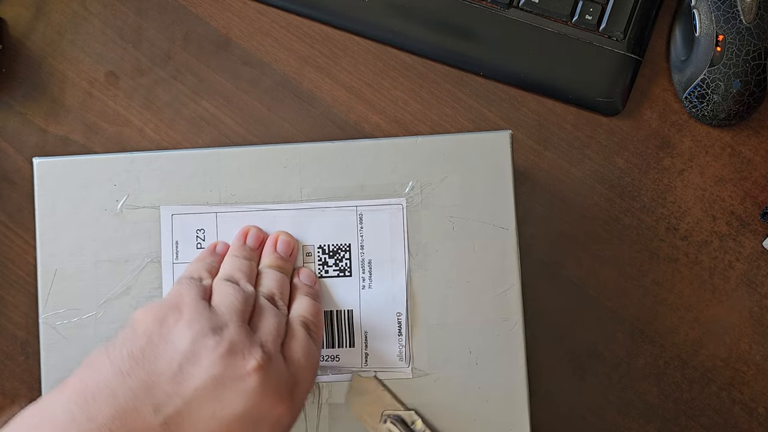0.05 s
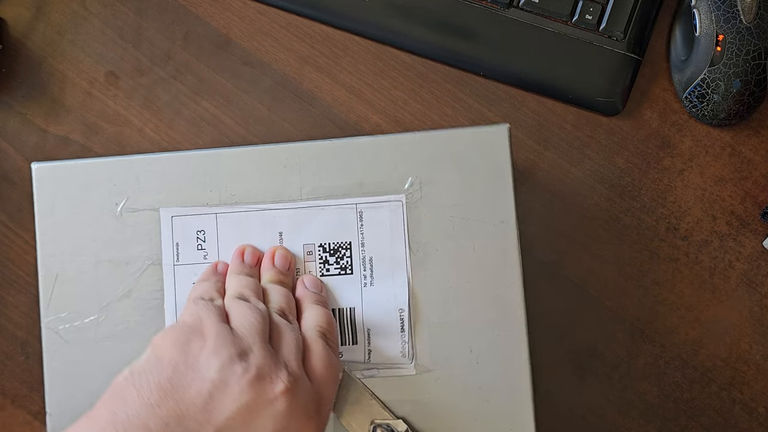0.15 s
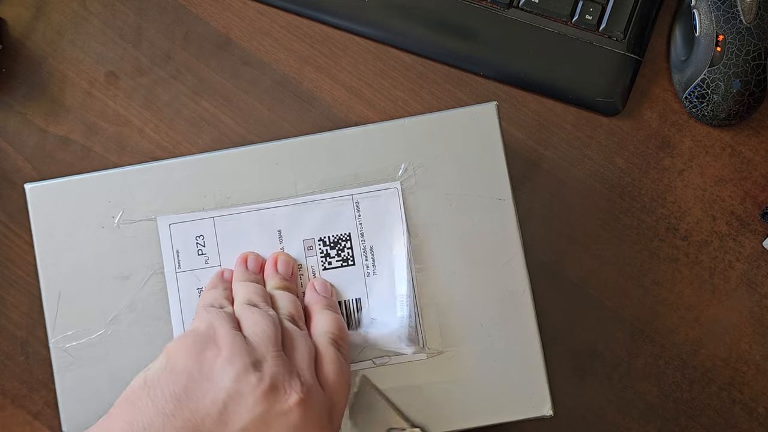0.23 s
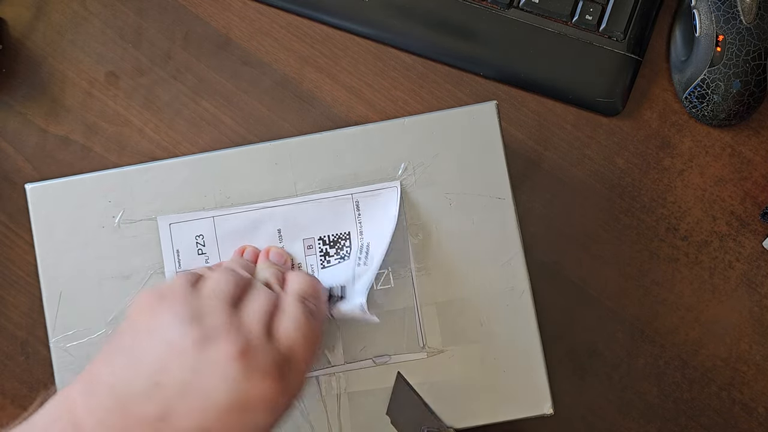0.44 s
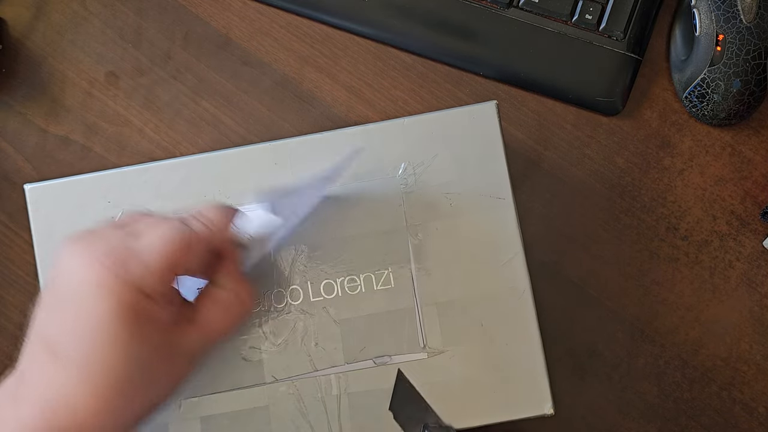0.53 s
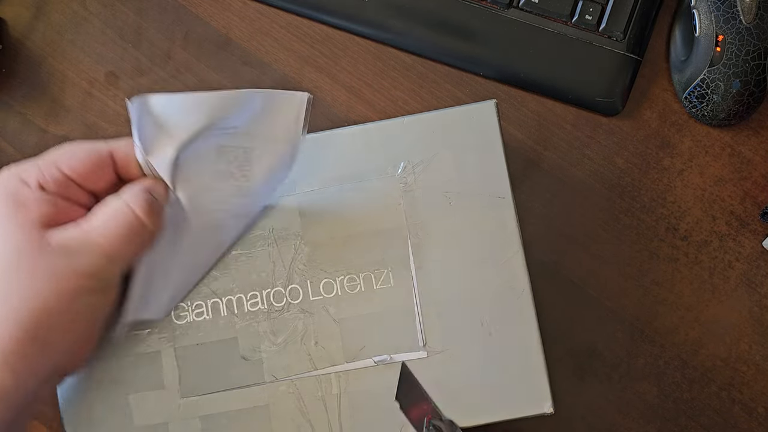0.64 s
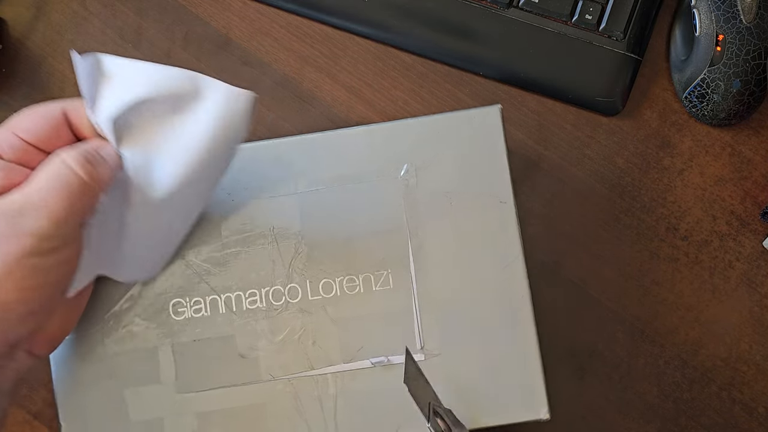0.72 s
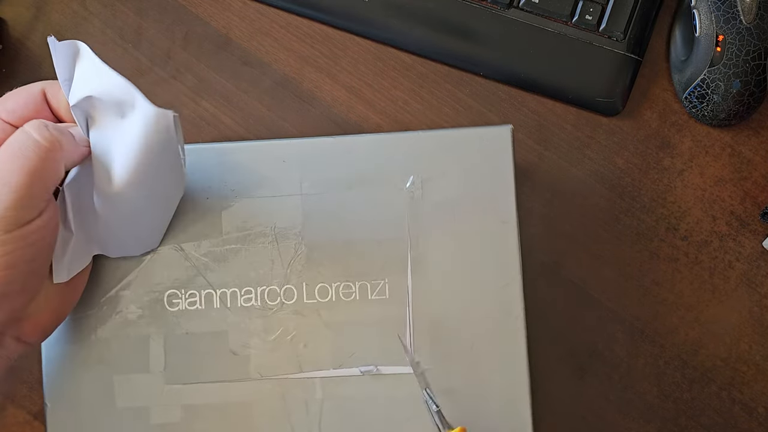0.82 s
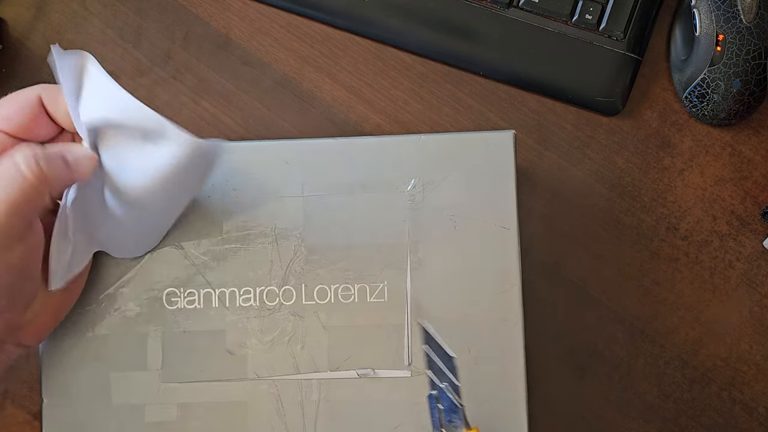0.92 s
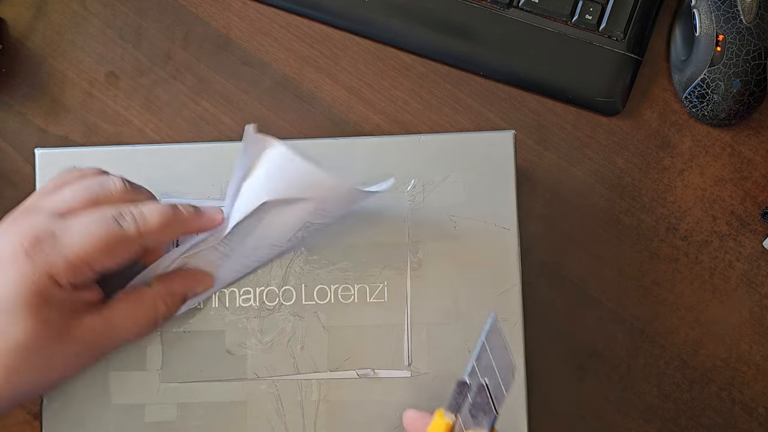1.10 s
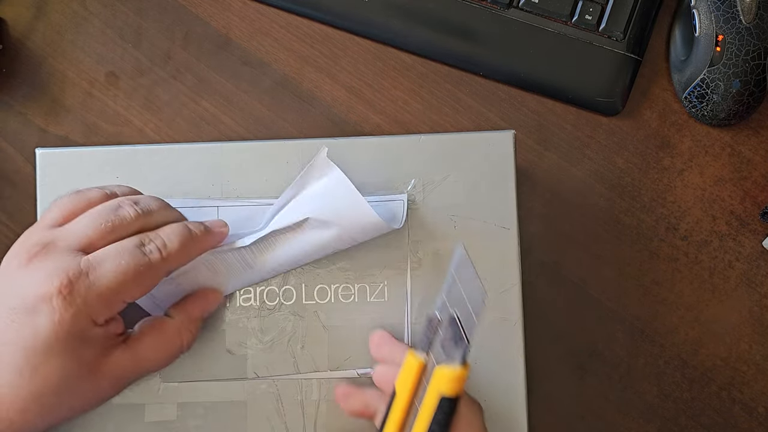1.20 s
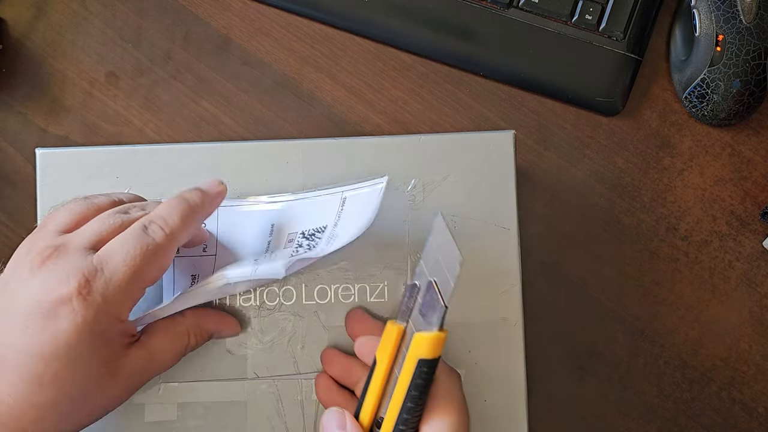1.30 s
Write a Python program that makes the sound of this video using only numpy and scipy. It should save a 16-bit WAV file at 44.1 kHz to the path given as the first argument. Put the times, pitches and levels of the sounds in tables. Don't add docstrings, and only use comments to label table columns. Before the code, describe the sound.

Close up, an adhesive label rips off a hollow carton: a short snap, a rough tear, then a hard final burst, followed by faint paper handling over quiet room rumble and hiss.

```python
import sys
import numpy as np
from scipy import signal
from scipy.fft import rfft, irfft
from scipy.io import wavfile
from scipy.ndimage import uniform_filter1d

SR = 44100
rng = np.random.default_rng(int(sys.argv[2]) if len(sys.argv) > 2 else 0)


def unload_wav(signal):
    wavfile.write(
        sys.argv[1],
        SR,
        np.round(np.clip(np.atleast_2d(signal).T, -1, 1) * 32767).astype(np.int16),
    )


def volts_from_db(level):
    exponent = np.asarray(level, float) / 20
    return 10 ** exponent


N = 59535

PORT_HZ = 1740
PORT_DB = np.array([0.54, -0.46])


def evened(x):
    return x / np.sqrt(np.mean(x ** 2) + 1e-20)


def peaked(x):
    return x / np.max(abs(x))


def read(points, hz):
    f, value = np.transpose(points)
    return np.interp(np.log(hz + 1), np.log(f + 1), value)


def add(mix, s, sound):
    part = mix[..., round(s * SR):][..., :sound.shape[-1]]
    part += sound[..., :part.shape[-1]]


def colour(x, points):
    return irfft(rfft(x) * volts_from_db(read(points, np.fft.rfftfreq(len(x), 1 / SR))), len(x))


def band(x, hz, kind, order=2):
    return signal.sosfilt(signal.butter(order, np.clip(hz, 20, 20000), kind, fs=SR, output="sos"), x)


def snap(start, db, hz, box_db, crack_db, rise_s, slower):
    noise, size, slip_noise = rng.standard_normal((3, 3000))
    t = np.arange(3000) / SR
    rise = np.minimum(t / rise_s, 1)
    tick = volts_from_db(5 - 60 * t / 0.0025)
    cracks = noise * abs(size) * rise * (volts_from_db(-60 * t / 0.013 / slower) + tick)
    slips = slip_noise * rise * (volts_from_db(-60 * t / 0.0069 / slower) + volts_from_db(-14) * tick)
    crackle = peaked(band(band(cracks, 10000, "low", order=1), 3360, "high"))
    sound = volts_from_db(-9.5) * sheet_ring(t, hz, slips, rise_s, slower) + volts_from_db(8 + crack_db) * crackle
    sound = sound + volts_from_db(-4 + box_db) * box_thump(t, slips)
    return start - rise_s, ports(volts_from_db(db) * sound)


def sheet_ring(t, hz, slips, rise_s, slower):
    tone = np.minimum(t * hz / 2, 1) * volts_from_db(-60 * t / 0.009) * np.sin(2 * np.pi * hz * t)
    push = rng.choice([-4, 4]) / slower ** 2 * np.exp(-((t - rise_s) * hz * 4) ** 2)
    ring = peaked(signal.oaconvolve(push + 0.53 * slips, tone)[:len(t)])
    flap = peaked(band(band(slips, 4940, "low", order=4), 685, "high"))
    spike = band(np.exp(-((t - rise_s) / 0.00007) ** 2), 810, "high", order=1)
    return ring + volts_from_db(0.5) * flap - volts_from_db(-3) / slower ** 2 * spike


def box_thump(t, slips):
    shove = np.exp(-t / 0.0008) + 0.28 * slips
    shift = 1 + 0.1 * np.tanh(rng.standard_normal())
    return peaked(signal.oaconvolve(shove, box_ring(shift))[:len(t)])


def box_ring(shift=1):
    # f/Hz, level/dB, t60/s
    box_modes = [(130, -2, 0.049), (159, 0.5, 0.025), (291.6, 5, 0.024), (325.8, 2.5, 0.045),
                 (445, 1.5, 0.023), (474, -1, 0.022), (646, 2.5, 0.0087)]
    t, ring = np.arange(4410) / SR, 0
    for k, (hz, db, t60) in enumerate(box_modes):
        decay = volts_from_db(db - 60 * t / np.clip(t60, .01, .04))
        ring = ring + (-1) ** k * decay * np.sin(2 * np.pi * hz * shift * t)
    return peaked(ring)


def rustle():
    # f/Hz, density/dB per Hz
    sheet_spectrum = [(290, -51), (500, -1.5), (855, -18), (1320, -6.5), (2460, -9), (3700, -10.5),
                      (16000, -23.5)]
    # f/Hz, density/dB per Hz
    glue_spectrum = [(180, -43), (300, -21), (1430, -5), (2520, -54), (3350, -10.5), (16000, -11.5)]
    # start t/s, length/s, effort level/dB, brightness/0-1, box rub level/dB
    strokes = [(0, 0.0095, -46, 0.48, 0.5), (0.049, 0.1, -51, 0.9, -25), (0.222, 0.015, -24, 0.64, -17),
               (0.326, 0.037, -51.5, 0, -9), (0.401, 0.052, -30, 0.6, -35), (0.469, 0.044, -36, 0.03, -4),
               (0.531, 0.051, -40, 0.41, -1), (0.593, 0.047, -29.5, 0.64, -23),
               (0.641, 0.011, -20.5, 0.76, -35), (0.662, 0.066, -38, 0.28, -20),
               (0.745, 0.021, -47, 0.4, -39), (0.88, 0.04, -41, 0.3, -10), (0.918, 0.038, -51, 0, -3),
               (1.037, 0.021, -41, 0.26, -10), (1.085, 0.04, -49.5, 0.32, -7),
               (1.215, 0.017, -53, 0.07, -30), (1.237, 0.019, -52.5, 0.07, -34),
               (1.273, 0.012, -41.5, 0.4, -23), (1.328, 0.023, -49.5, 0.7, -8)]
    grains_per_s, grain_spread_db, grain_s = 2500, 4, 0.003
    rise_s, fall_db_per_s = 0.0073, 519
    t, layers = np.arange(N) / SR, []
    for spectrum in (sheet_spectrum, glue_spectrum):
        size = volts_from_db(grain_spread_db * np.minimum(rng.exponential(1, N), 5))
        size = size * (rng.random(N) < grains_per_s / SR)
        envelope = signal.oaconvolve(size, volts_from_db(-60 * t[:400] / grain_s / 3))[:N]
        grains = envelope * rng.standard_normal((2, N))
        left, right = [evened(colour(side, spectrum)) for side in grains]
        layers.append(np.array([left, right + band(left - right, PORT_HZ, "low", order=1)]))
    short_ring = box_ring() * volts_from_db(-60 * t[:4410] / 0.0075)
    dull, tearing = layers
    rub = evened(signal.oaconvolve(grains[0], short_ring)[:N])
    out = np.zeros((2, N))
    for start, length, db, bright, rub_db in strokes:
        share = np.clip(bright, 0, 1)
        fall = volts_from_db(db - fall_db_per_s * np.maximum(t - start - length, 0))
        shape = np.clip((t - start) / rise_s, 0, 1) * fall
        out += shape * ((1 - share) * dull + share * tearing + volts_from_db(rub_db) * rub)
    return volts_from_db(3.5 + PORT_DB)[:, None] * out


def strain(start, length, db, from_hz, to_hz):
    t = np.arange(2000) / SR
    u = np.clip(t / length, 0, 1)
    glide = from_hz * (to_hz / from_hz) ** np.sqrt(u)
    turn = np.exp(2j * np.pi * np.cumsum(glide) / SR)
    r = np.exp(-np.pi * 500 / SR)
    real, imaginary = rng.standard_normal((2, 2000))
    slow = signal.lfilter([1], [1, -2 * r, r * r], real + 1j * imaginary, zi=[300, 0])[0]
    swell = abs(np.sin(np.pi * u ** .7))
    return start, volts_from_db(db) * peaked(swell * (turn * slow).real) * volts_from_db(PORT_DB)[:, None]


def ports(x):
    path = rng.standard_normal((2, 200)) * volts_from_db(-60 * np.arange(200) / SR / 0.00067)
    path = volts_from_db(2.5) * path / np.linalg.norm(path, axis=1)[:, None]
    path[[0, 1], [0, 3]] += 1
    low = band(x, PORT_HZ, "low", order=1)
    high = signal.oaconvolve((x - low)[None], path, axes=1)[:, :len(x)]
    return low + volts_from_db(PORT_DB)[:, None] * high


def room(x):
    # f/Hz, t60/s
    room_decay = [(200, 0.046), (1000, 0.088), (4000, 0.17), (12000, 0.11)]
    taps = np.zeros((2, SR // 2))
    at = np.arange(round(.003 * SR), SR // 2 - 20, 10)
    taps[:, at] = rng.choice([-1., 1.], (2, len(at)))
    hz, t, z = signal.stft(taps, SR, nperseg=128)
    z[1] = np.where(hz[:, None] < 500, z[0], z[1])
    tail = signal.istft(z * volts_from_db(-60 * t / read(room_decay, hz)[:, None]), SR, nperseg=128)[1]
    return signal.fftconvolve(x[None], tail / np.linalg.norm(tail[0]), axes=1)[:, :N]


def hum():
    # f/Hz, density/dB per Hz
    hum_spectrum = [(20, -32), (42, 2), (75, -4.5), (105, -5.5), (300, -10.5), (800, -17.5), (2000, -22.5),
                    (16000, -37.5)]
    # f/Hz, correlation/0-1
    likeness = [(60, 0.93), (180, 0.91), (550, 0.52), (1650, 0.04), (4970, 0.24), (15000, 0.23)]
    # t/s, level/dB, f/Hz, t60/s
    desk_thuds = [
        (.004, -31, 65, .07),
        (.255, -40, 60, .1),
        (1.035, -38, 55, .12),
        (1.265, -38, 42, .15),
    ]
    frames, hz = N // 256 + 5, np.fft.rfftfreq(1024, 1 / SR)
    a, b, c, d, patches = rng.standard_normal((frames, 513, 5)).T
    patches = uniform_filter1d(uniform_filter1d(patches, size=12, axis=0), size=14, axis=1)
    same, left = np.clip(read(likeness, hz), -1, 1)[:, None], a + 1j * b
    right = same * left + np.sqrt(1 - same ** 2) * (c + 1j * d)
    z = np.array([left, right]) * volts_from_db(read(hum_spectrum, hz)[:, None] + 1.5 * evened(patches))
    noise = evened(signal.istft(z, nperseg=1024, noverlap=768)[1][:, :N])
    thuds, t = np.zeros(N), np.arange(SR // 4) / SR
    for s, db, thud_hz, t60 in desk_thuds:
        add(thuds, s, volts_from_db(db - 60 * t / t60) * np.sin(2 * np.pi * thud_hz * t))
    return volts_from_db(-45.5) * noise + thuds


def scene():
    # t/s, peak level/dB, sheet f/Hz, box level/dB, crack level/dB
    snaps = [(.136, -47, 1240, -27, -9), (.226, -29, 2700, -32, -29), (.2305, -18.5, 4210, -2.5, -1),
             (.2345, -16, 2760, -9, -12), (.411, -10.5, 1260, -11, -18), (.4197, -12.5, 3840, -31, 6),
             (.427, -22, 1600, -37, -33), (.44, -17.5, 1260, -14, -13), (.4742, -19.5, 3340, -26, -23),
             (.491, -25, 800, -23, -38), (.504, -20.5, 580, 0.5, -4.5), (.578, -16.5, 2430, -2, -15),
             (.5995, -15.5, 1670, -5.5, -13), (.612, -14, 1740, -15, -32), (.6255, -5, 5360, -12, -19.5),
             (.6295, -8, 1630, -22, -17), (.641, -10, 1910, -8, -7), (.646, -17, 5360, -13, -28),
             (.6527, -2, 1620, -14, -9.5), (.658, -9.5, 1780, -18, -9), (.677, -11, 1560, -12.5, -13.5),
             (.716, -13, 1400, -13.5, -24), (.7185, -18, 5950, -3.5, -8), (.728, -24, 2770, -27, -2),
             (.782, -25, 770, -6, -5.5)]
    crinkles = [(.058, -38, 1270, 2, -18), (.75, -29, 1980, -5.5, -27), (.89, -48, 2870, 11, -20),
                (.902, -33, 2860, -28, -9), (.921, -27.5, 1490, -4, -33), (.945, -27, 1350, -11, -44),
                (.979, -31, 3060, -25, -15.5), (.993, -35.5, 1300, -23, -18), (1.017, -35, 1380, -24, -45),
                (1.049, -50, 2530, -26, -27), (1.063, -30, 2400, -10, -26), (1.097, -29.5, 1650, -32, -26),
                (1.252, -27, 2890, -37, -25), (1.253, -23, 1290, -44, -35), (1.273, -30, 1670, -11, -31),
                (1.285, -22, 1550, -36, -18.5), (1.329, -33, 710, 0.5, -35)]
    further_snaps = [(.231, -17, 1370, -3.5, -8), (.2405, -17.5, 490, 2.5, -18), (.4063, -21, 1530, -7, -9),
                     (.4135, -21, 895, -4, -30), (.4203, -15, 1310, -11, -21), (.4762, -17, 1700, -29, -33),
                     (.602, -14.5, 2730, -15, -8), (.6495, -16.5, 2560, -14, -9), (.6553, -10, 3900, -30, -11),
                     (.6605, -11.5, 3660, -17, -3.5), (.6655, -16.5, 1340, -18, -20),
                     (.6705, -20.5, 2010, -9, -17), (.686, -38, 1600, -18, -18), (.7075, -30, 3020, -27, -33)]
    creases = [
        (.893, -37, 2700, -25, -18),
        (.917, -26, 1390, -22, -28),
        (.9225, -27.5, 2200, -27, -33),
        (1.046, -26.5, 770, -9, -29),
        (1.0525, -29, 2470, -23, -15),
        (1.066, -30, 1520, -14, -30),
        (1.0975, -33.5, 2470, -38, -19),
    ]
    # start t/s, length/s, level/dB, from f/Hz, to f/Hz
    strains = [
        (.4105, .0045, -22, 3300, 3400),
        (.419, .003, -20, 3350, 3350),
        (.4265, .005, -24, 3400, 3400),
        (.474, .005, -21, 3250, 3300),
        (.489, .033, -25, 1050, 340),
        (.646, .016, -17, 1420, 1600),
        (.888, .012, -36, 2900, 2850),
        (.916, .008, -31, 1310, 1310),
    ]
    paper = rustle()
    sharp, soft = (.0004, 1), (.003, 2.5)
    for rows, kind in ((snaps, sharp), (crinkles, soft), (further_snaps, sharp), (creases, soft)):
        for row in rows:
            add(paper, *snap(*row, *kind))
    for row in strains:
        add(paper, *strain(*row))
    paper = band(paper, 131, "high", order=3)
    return paper + volts_from_db(-4.5) * room(paper.mean(0)) + hum()


def band_limit(x):
    return signal.sosfilt(signal.butter(12, 16980, fs=SR, output="sos"), x)


def record(dry):
    ceiling = 1.05
    x = ceiling * np.tanh(volts_from_db([0, -1])[:, None] * dry / ceiling)
    return band_limit(x)


dry = scene()
out = record(dry)
unload_wav(out)
```